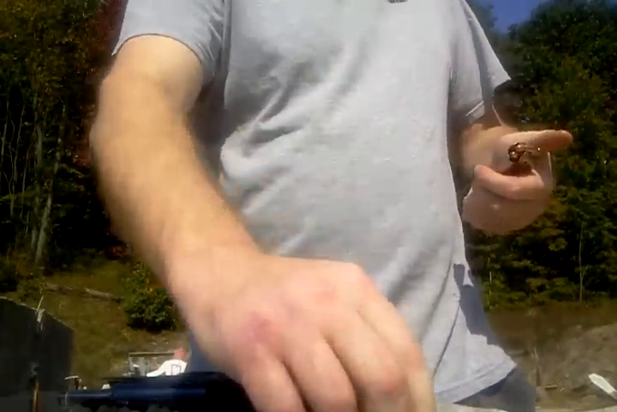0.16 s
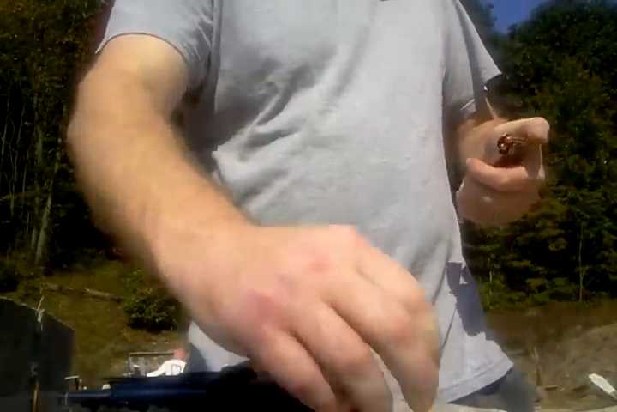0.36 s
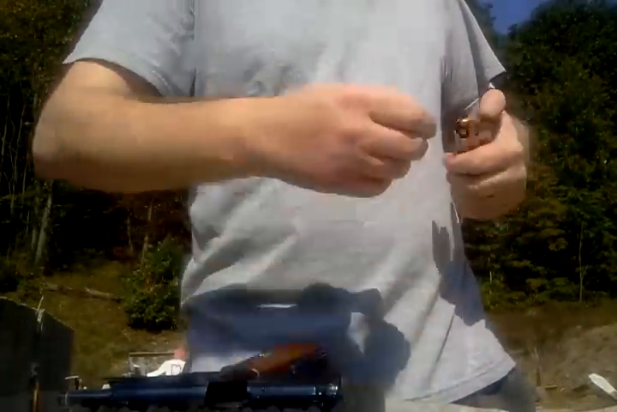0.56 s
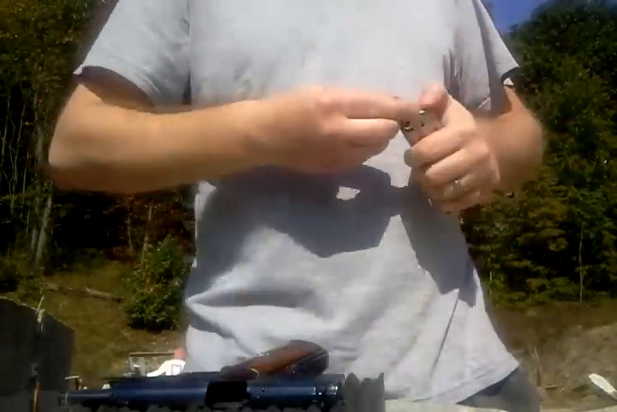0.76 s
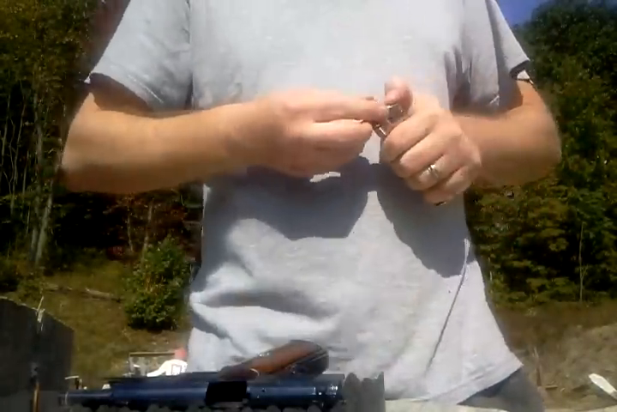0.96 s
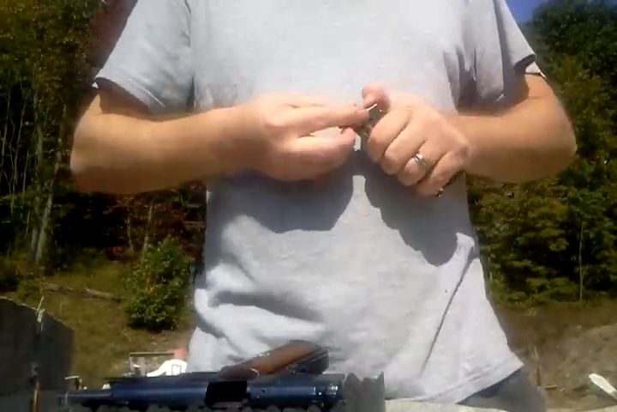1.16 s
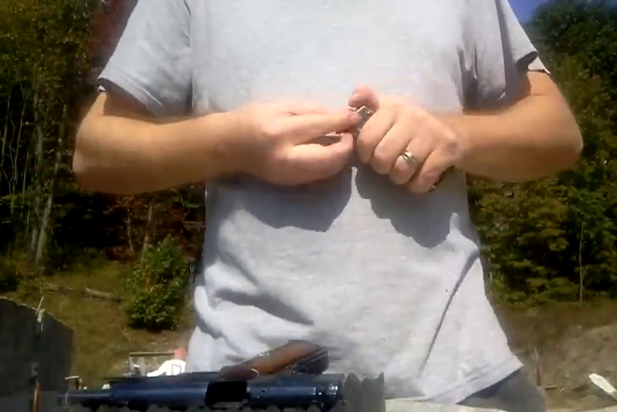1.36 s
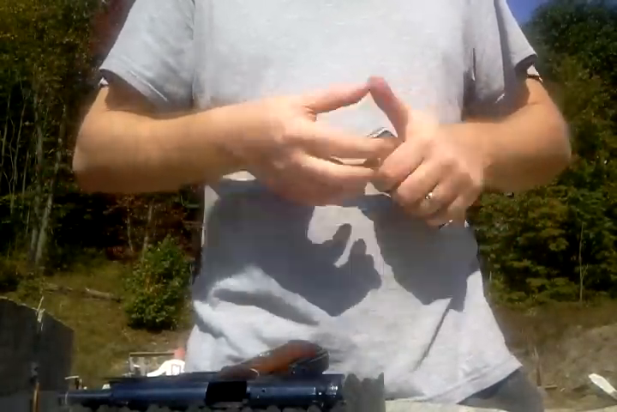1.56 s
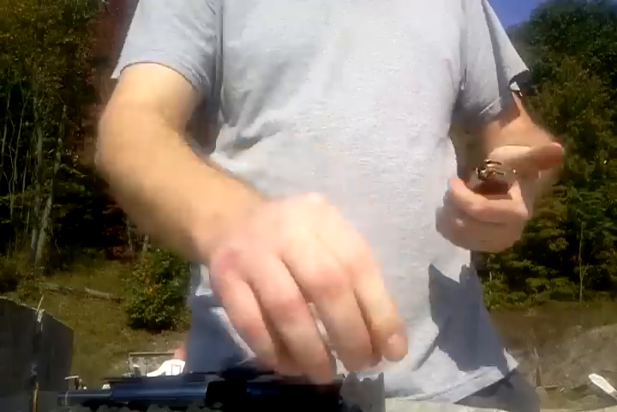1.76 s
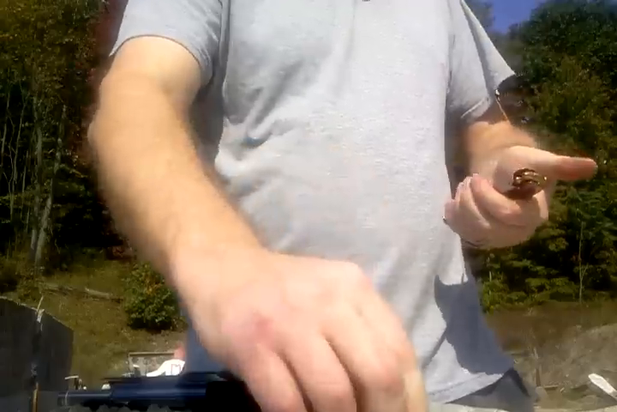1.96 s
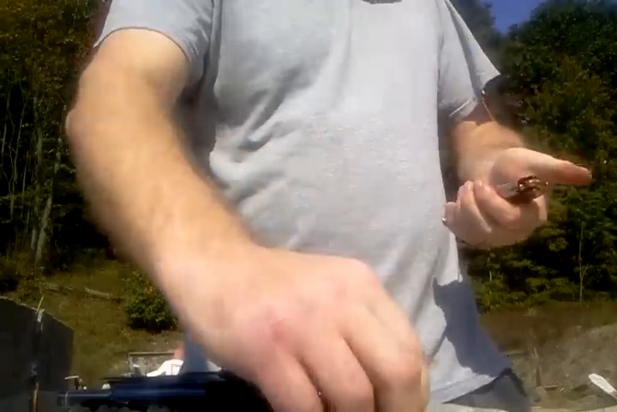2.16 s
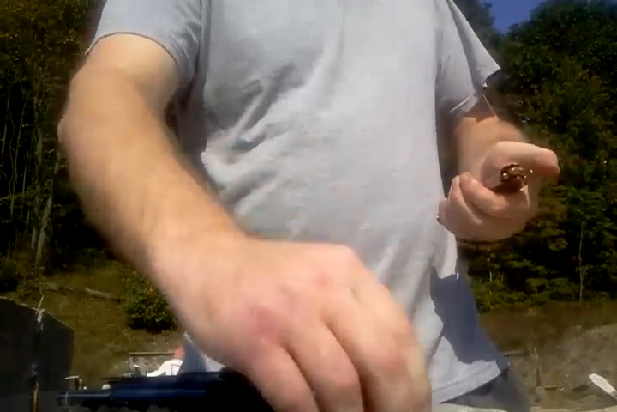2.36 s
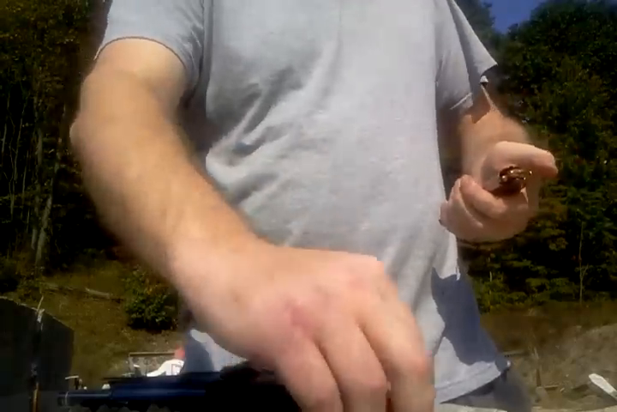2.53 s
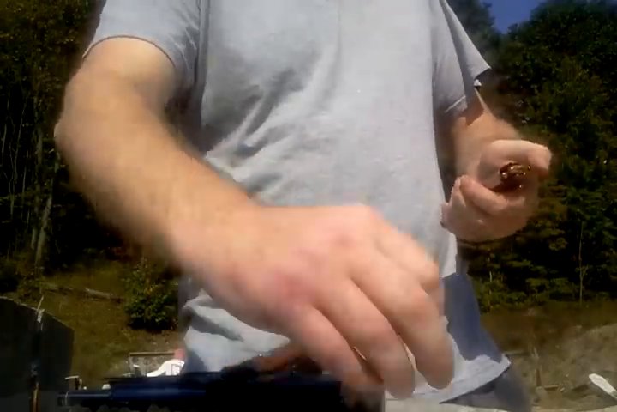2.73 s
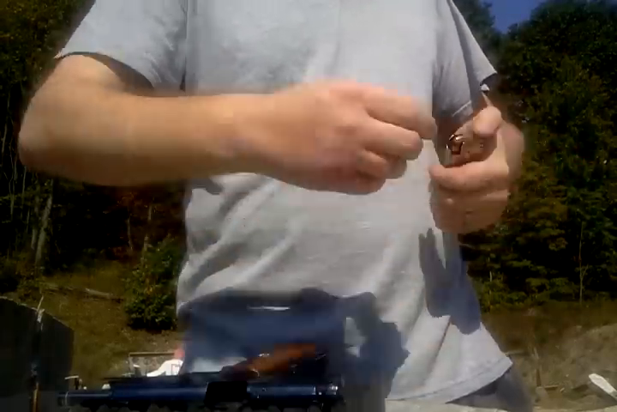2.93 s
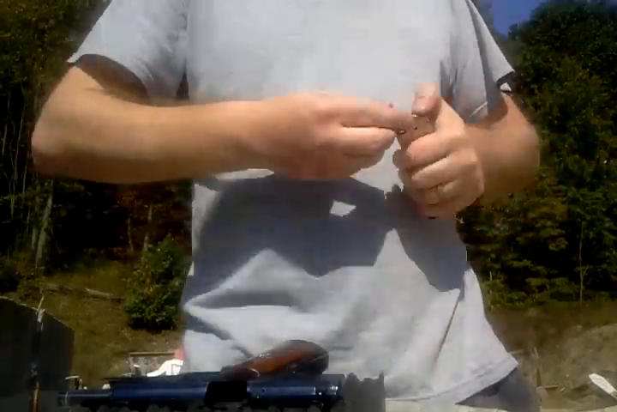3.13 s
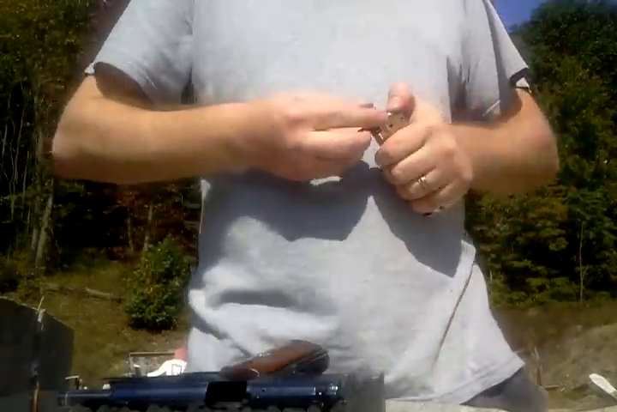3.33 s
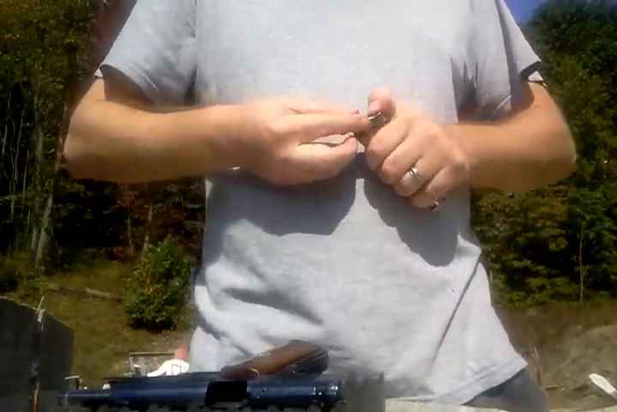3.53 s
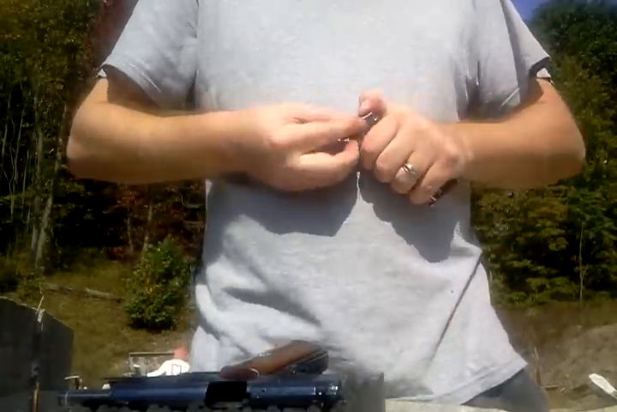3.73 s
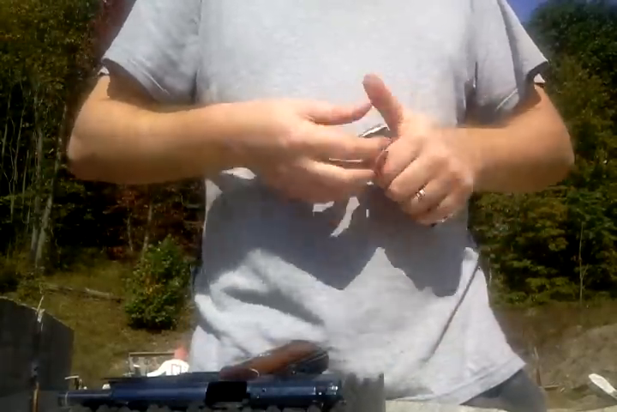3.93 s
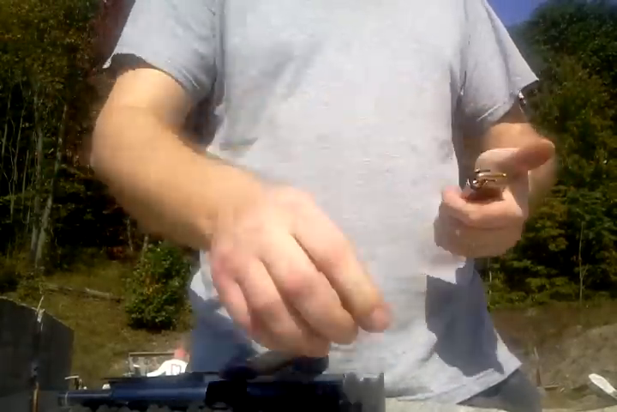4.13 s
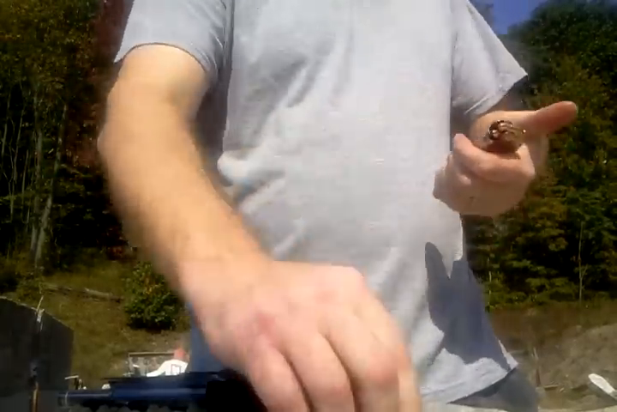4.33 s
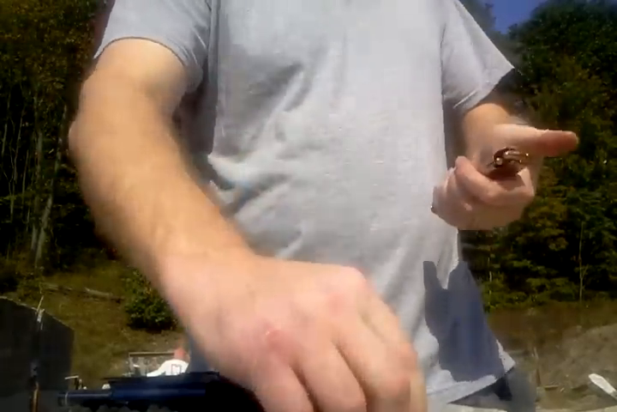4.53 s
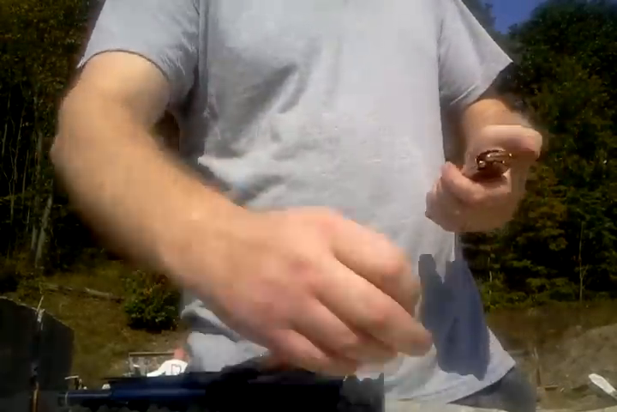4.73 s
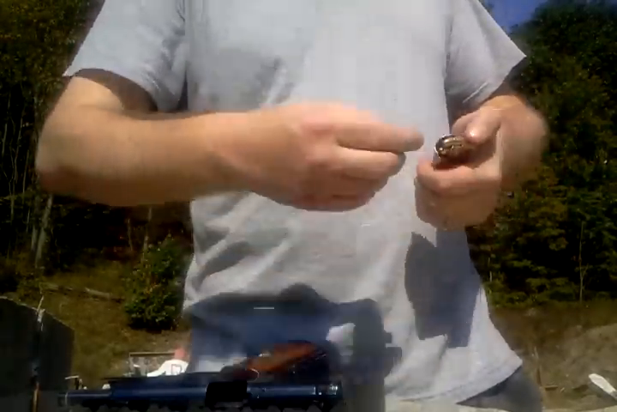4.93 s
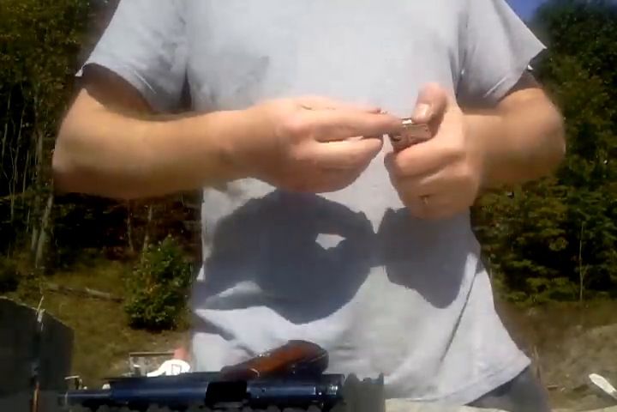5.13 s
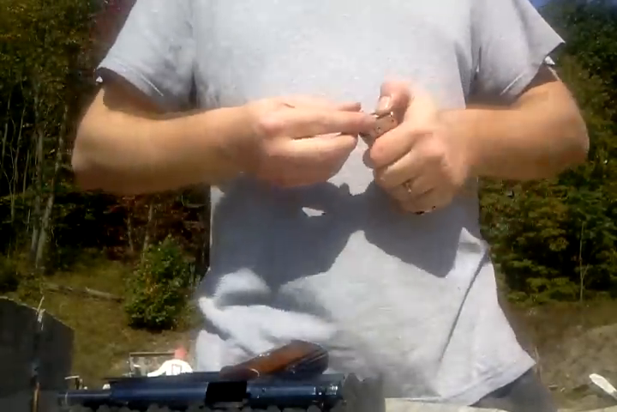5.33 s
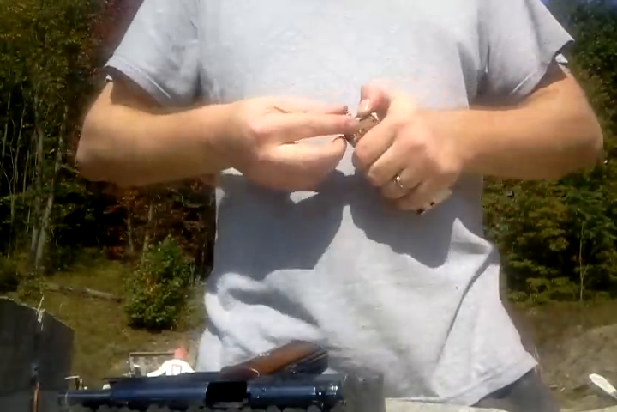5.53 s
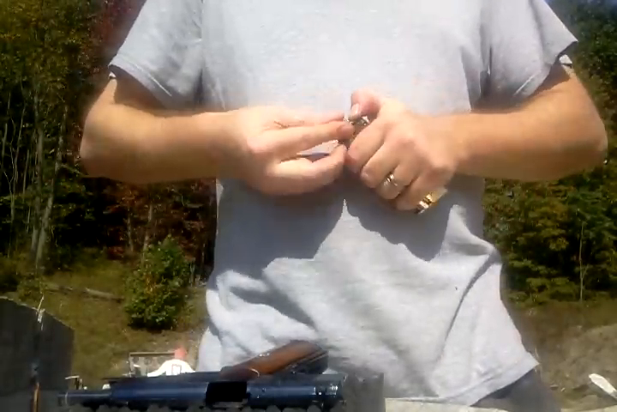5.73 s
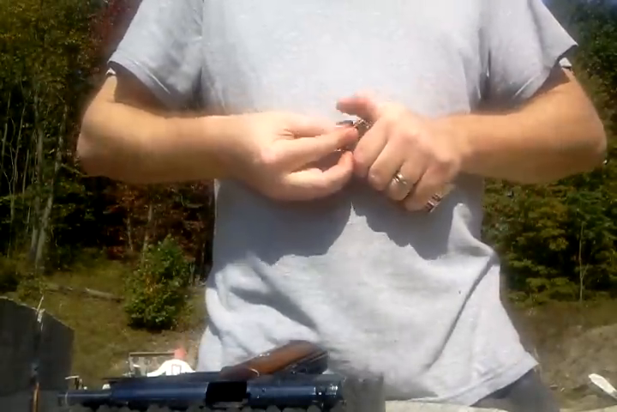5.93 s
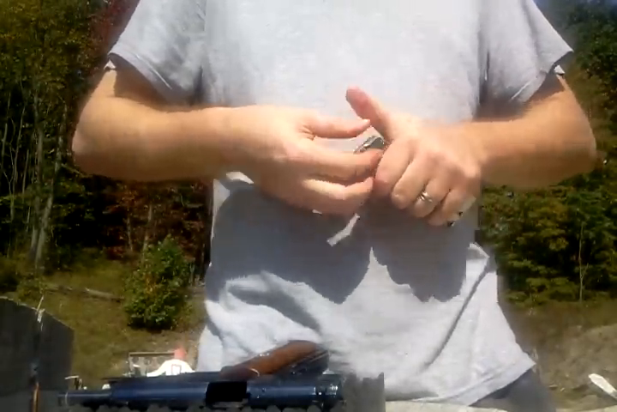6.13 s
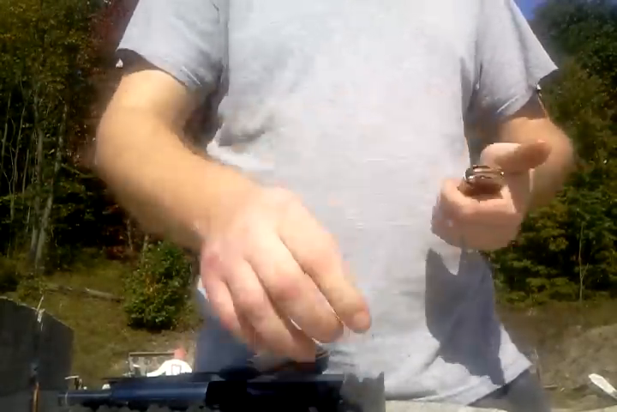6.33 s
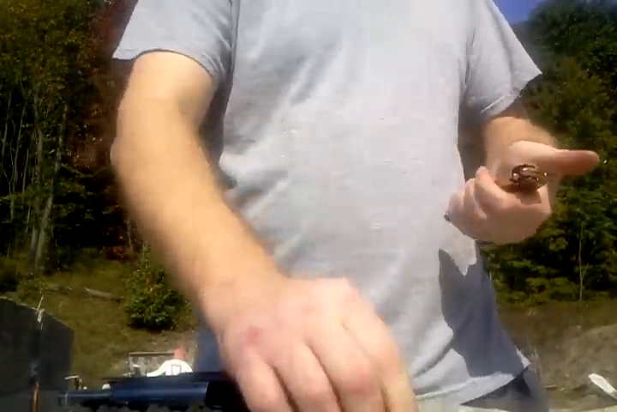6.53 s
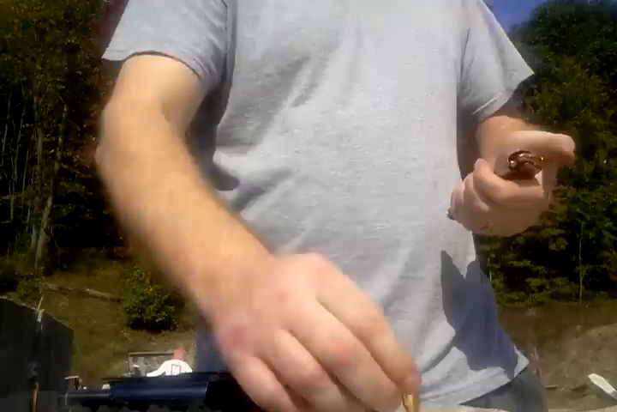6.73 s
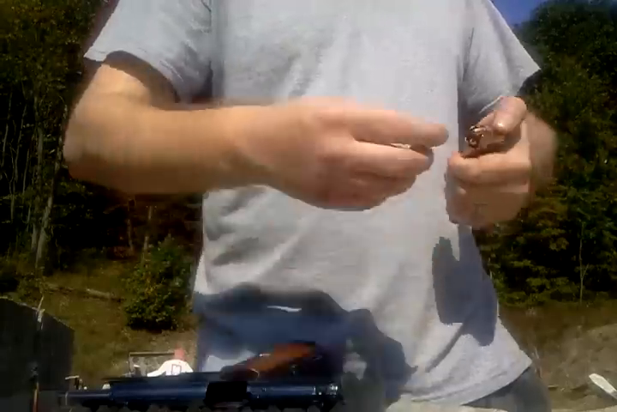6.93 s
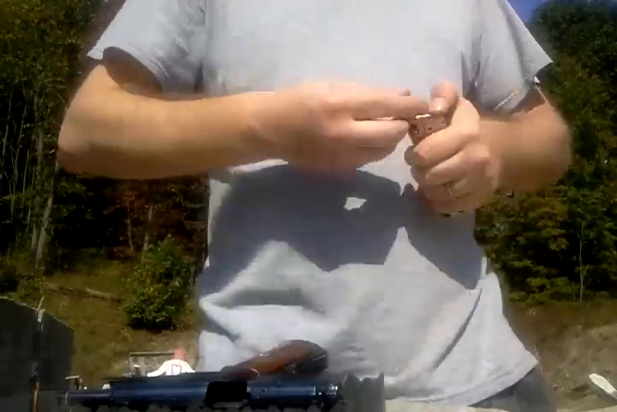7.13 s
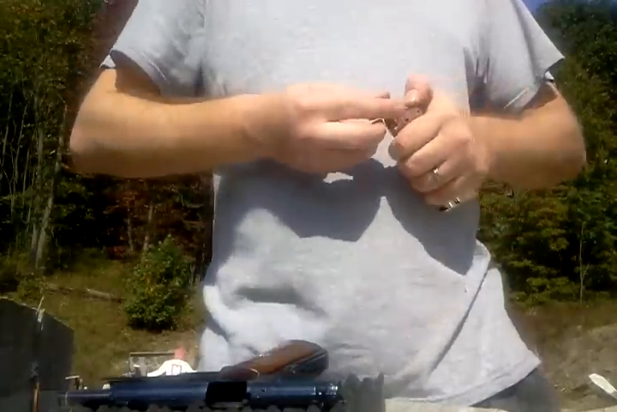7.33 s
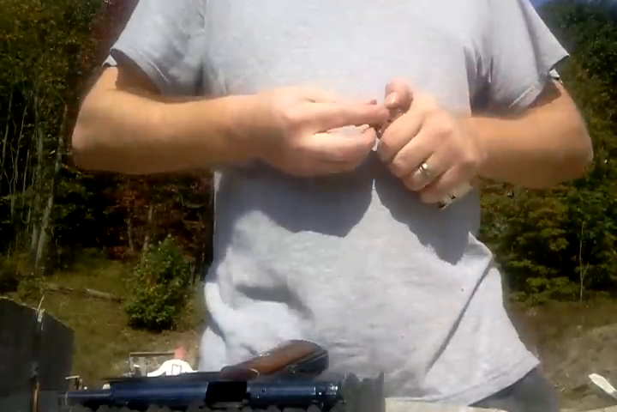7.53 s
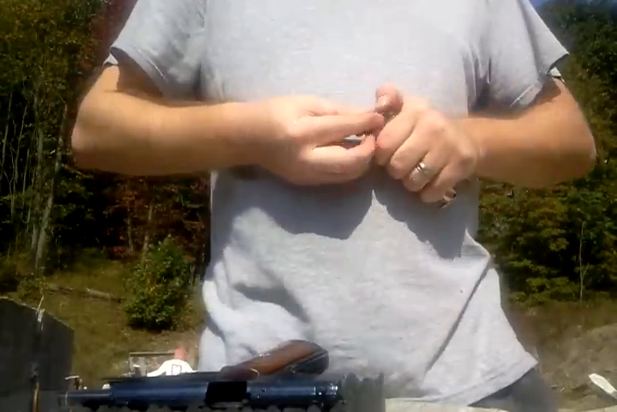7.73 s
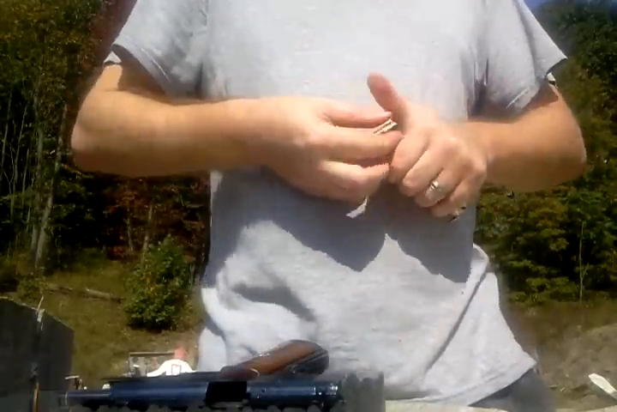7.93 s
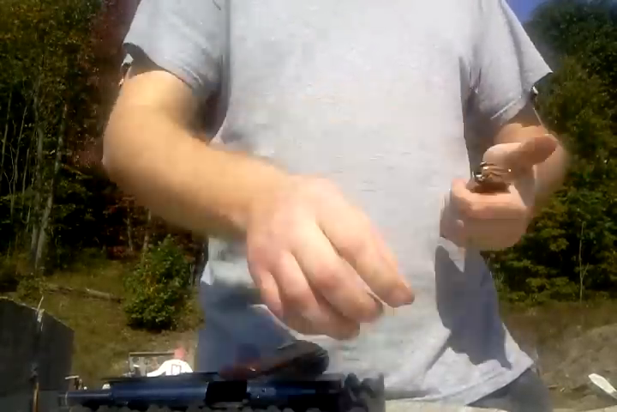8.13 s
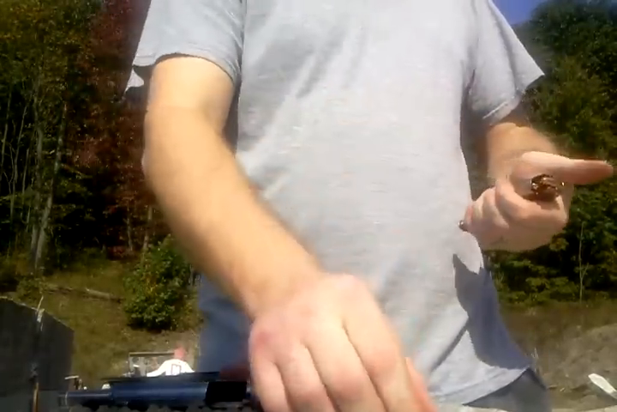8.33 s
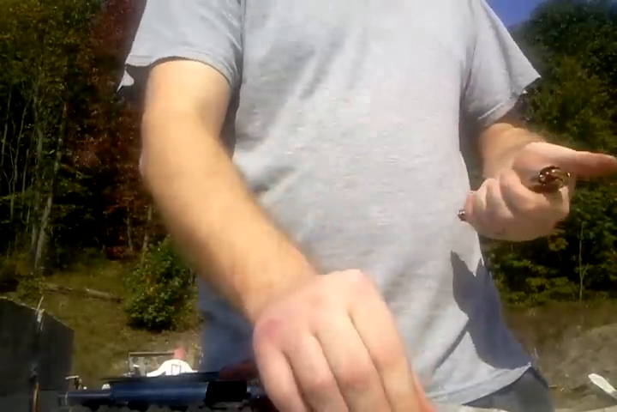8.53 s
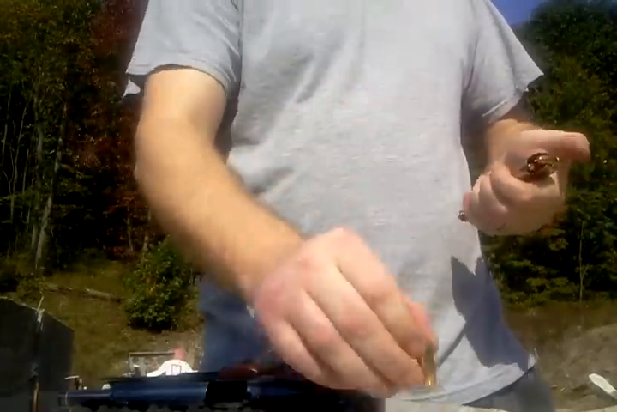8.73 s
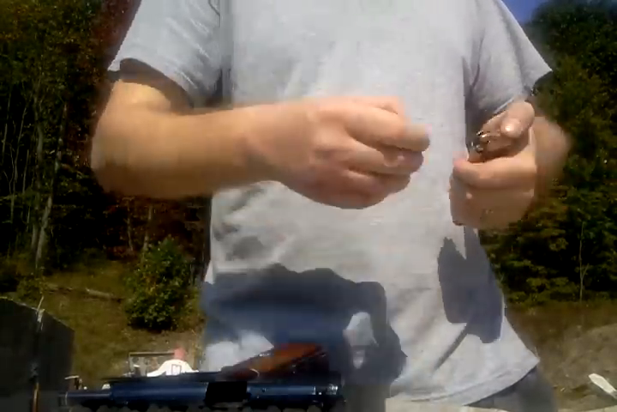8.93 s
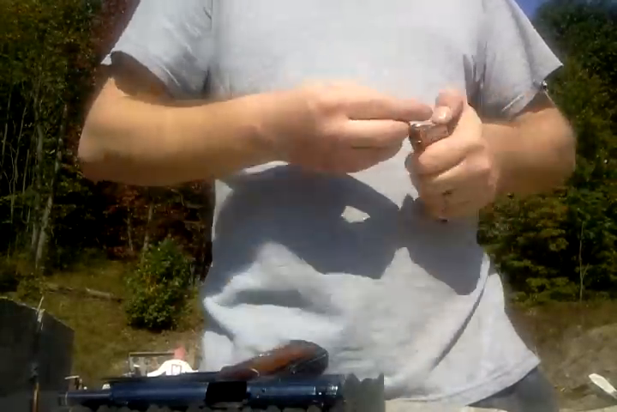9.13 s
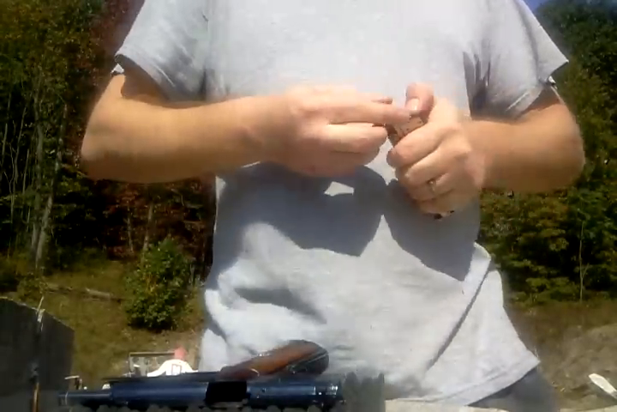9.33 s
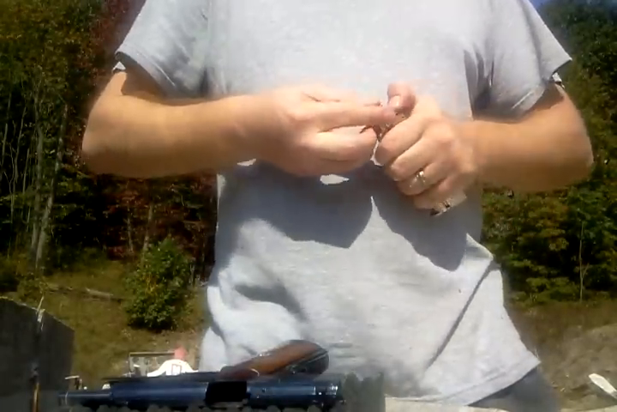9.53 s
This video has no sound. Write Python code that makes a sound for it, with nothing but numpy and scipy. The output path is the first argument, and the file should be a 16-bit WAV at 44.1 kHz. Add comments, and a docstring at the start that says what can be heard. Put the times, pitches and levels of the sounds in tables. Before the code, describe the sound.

Outdoors, soft steady air and a faint distant engine hum run throughout, with a few gentle wind puffs on the small, slightly dull microphone in the first half. Close by, fingers rustle quietly in a cartridge box. From about 1 second, brass clicks and scrapes against a pistol magazine, and a cartridge snaps home at 1.6. More rustling and light knocks come from the box between 2 and 3 seconds. Clicks resume at 3.3, ending in a sharper snap at 4. Brief rummaging follows around 4.5, then more small clicks. At about 5.9 a loud nearby gunshot cracks, its echo swelling back from a wooded slope and fading over a second or so. Clicks and box handling continue, and a second, equally loud shot comes at 7.9 with the same echo. Light rustling and knocks near 8.5 to 9 and faint ticks around 9.5 finish.

```python
"""Cartridges are pressed one by one into a pistol magazine at an outdoor range.
Brass taps, scrapes and snaps under the steel lips, ringing the hand-damped magazine; fingers
bump and rustle in the cartridge box. Two nearby gunshots ring the bench, and the wooded slope
throws each back as a long swelling echo. Behind it: steady air, a faint far engine and soft
puffs of wind on the microphone."""
import sys
import numpy as np
from scipy import signal
from scipy.fft import rfft, irfft, next_fast_len
from scipy.io import wavfile

SR = 44100
rng = np.random.default_rng(int(sys.argv[2]) if len(sys.argv) > 2 else 0)


def materialize(psi):
    """Save the field psi as 16-bit PCM at rate SR to the path in sys.argv[1].

    A 1-D psi becomes a single channel; in a 2-D psi each row is a channel.
    """
    bounded = np.clip(np.atleast_2d(psi).T, -1, 1)
    quanta = np.round(bounded * 32767).astype(np.int16)
    wavfile.write(sys.argv[1], SR, quanta)


N = 426888
TIME_S = np.arange(N) / SR

# Spectra of open air, engine roar and microphone. Each row: frequency in Hz, gain in dB.
AIR_SPECTRUM = [(15, -60), (25, -41.5), (97, -11), (120, -6.5), (230, -8.5), (339, -10), (411, -12.5),
                (562, -9), (699, -16.5), (1130, -21), (1440, -21), (1790, -21.5), (3610, -23.5),
                (5440, -22.5), (8000, -32), (10400, -72.5), (17600, -120)]
ROAR_SPECTRUM = [(60, -19), (120, -3), (175, -5.5), (230, -6), (330, -3), (440, -10.5), (560, -6),
                 (700, -8), (1100, -10.5), (2000, -18.5), (5000, -25)]
MIC_RESPONSE = [(20, -3), (6500, 0.5), (7300, -3.5), (7700, -10.5), (8000, -16.5), (8500, -16),
                (9000, -26.5)]
# Wind on the microphone. Each row: centre in seconds, level in dB, half-width in seconds.
WIND_PUFFS = [(0.245, -62, .03), (0.334, -55, .035), (1.328, -70, .03), (2.143, -55.5, .04),
              (2.437, -54, 0.044), (4.48, -58, .04)]
# Far engine. Each row: time in seconds, firing rate in Hz, hum level in dB.
ENGINE_TRACK = [(0, 135.7, -68.5), (1.4, 128.8, -60.5), (3, 123.3, -62.5), (5, 128.3, -60.5),
                (9.68, 127.6, -58.5)]
# Engine resonances. Each row: frequency in Hz, width in Hz, level in dB relative to the roar.
DRONE_BANDS = [(169, 8, -10.5), (275.4, 9.9, -13), (330, 6, -11.5), (560, 45, -9)]

# Gunshots. Each row: start in seconds, gain in dB.
GUNSHOTS = [(5.9487, 0), (7.912, 0.2)]
# Echoes off rough surfaces nearby. Each row: delay in seconds, relative level in dB, spread in seconds.
NEAR_ECHOES = [(.0026, -19, 0.0013), (0.018, -14, 0.001), (0.0236, -5.5, 0.00165), (.06, -17, .0007),
               (0.0835, -4, 0.0011)]
# Scatter off ground and benches, trees, far slope. Each row: frequency in Hz, gain in dB.
GROUND_SPECTRUM = [(50, -34), (130, -6), (250, -4.5), (380, 3), (900, 4.5), (1500, -4.5), (2300, -9.5),
                   (3400, -8), (5500, -9.5), (8000, -26.5)]
WOODS_SPECTRUM = [(60, -52), (150, -28.5), (260, -20), (370, -8), (600, -1), (1000, -0.5), (1600, -1),
                  (2100, -5.5), (3000, -4), (4800, -7), (6300, -3), (8000, -13)]
SLOPE_SPECTRUM = [(100, -39), (400, -15.5), (750, 0.5), (1150, -1), (1800, -7.5), (4000, -14.5),
                  (8000, -25.5)]

# Modes of bench, box and hand-damped magazine. Each row: frequency in Hz, gain in dB, T60 in seconds.
BENCH_MODES = [(378, -35, 0.06), (623.6, -25, 0.14), (697, -24.5, 0.082)]
BOX_MODES = [(256, -22, 0.08), (420, -22, .0075), (734, -12, 0.0089), (970, -4, .011), (1330, -2.5, 0.008),
             (1800, -1, 0.0082), (2340, -2.5, 0.0055), (2850, 2, 0.0063), (3640, 2.5, 0.01),
             (4800, 0, 0.0032), (6070, 1.5, 0.0057), (6530, -5.5, 0.0038)]
MAGAZINE_MODES = [(480, -24.5, .0098), (1080, -10, 0.0052), (1443, -6, 0.019), (1765, -0.5, 0.0078),
                  (2490, -4, 0.0088), (3187, -3, 0.017), (4060, -7, .0097), (4800, -8.5, .0075),
                  (5200, -9.5, 0.0054), (5840, -2, 0.0093), (6700, -12, 0.0072), (7160, -7, 0.0044)]
# Fingers and brass bumping the box. Each row: start in seconds, relative level in dB,
# hardness 0-1, scrape length in seconds, thud in Hz.
BOX_KNOCKS = [(.1408, -54, 0.38, 0.0063, 358), (.5676, -52, 0, .0019, 228),
              (2.2255, -51.5, 0.42, 0.0047, 536), (2.3995, -54.5, 0.73, .012, 458),
              (2.4144, -45.5, 0.28, 0.0099, 193), (2.4346, -48, 0.1, 0.012, 248),
              (2.6863, -57.5, .75, 0.0039, 450), (2.9075, -57, 0.6, .0035, 290),
              (2.9193, -44, 0.99, .0023, 267), (2.9288, -43.5, 0.4, 0.0064, 264.4),
              (4.4699, -48, 0.84, 0.0061, 563), (4.5467, -61.5, 0.87, .0029, 290),
              (6.9306, -40, 0.37, .0051, 473), (8.5118, -44, 0.63, 0.0037, 516),
              (8.9069, -43.5, 0.2, 0.0018, 484)]
# Fingers sliding cartridges in the box. Each row: start in seconds, length in seconds, level in dB.
RUMMAGE_RUNS = [(.02, .04, -63), (.18, 0.15, -57.5), (.342, 0.069, -56.5), (.45, 0.097, -57),
                (2.1, 0.061, -52.5), (2.178, 0.16, -54.5), (2.713, 0.17, -58), (4.48, .135, -53.5),
                (4.755, 0.12, -55.5), (6.7, .02, -52), (6.818, 0.054, -46.5), (6.888, .04, -49),
                (8.53, 0.039, -50.5), (8.645, .1, -52.5), (8.86, .04, -52)]
# Case rubbing the lips. Each row: start in seconds, length in seconds, level in dB, spot ring in Hz.
CASE_SLIDES = [(1.37, 0.047, -51, 3020), (1.46, 0.046, -46.5, 3100), (1.635, 0.082, -53, 3170),
               (3.375, 0.058, -61.5, 5100), (3.8, 0.07, -53, 6000), (4.018, 0.078, -61, 5760),
               (5.5, 0.03, -60, 4060), (7.74, 0.061, -59, 6140), (7.82, 0.094, -55.5, 2210)]
# Thumb working a cartridge in. Each row: start in seconds, length in seconds, relative level in dB.
THUMB_RUNS = [(1.115, 0.2, -54), (1.573, .03, -51.5), (3.42, 0.087, -45.5), (3.9, .11, -56.5),
              (5.583, .03, -48), (7.767, 0.035, -46), (9.396, 0.034, -48.5), (9.557, .03, -52)]
# Brass on the magazine. Each row: start in seconds, relative level in dB, firmness 0-1,
# scrape length in seconds, spot ring in Hz.
BRASS_CLICKS = [(.9865, -45, 0.78, 0.005, 2900), (1.0123, -43.5, 0.6, .0033, 5680),
                (1.075, -48, 0.4, .0032, 6400), (1.2867, -53, 1, .0036, 3150),
                (1.3922, -43.5, 1, 0.0023, 2930), (1.4357, -39, .2, 0.003, 5200),
                (1.4972, -33.5, 0.74, 0.0048, 5760), (1.6111, -38, 0.66, .0027, 4370),
                (1.6656, -42.5, 1, 0.0022, 2850), (1.6911, -43, 0.93, 0.0068, 5800),
                (3.2642, -30, 0.44, .011, 4200), (3.3689, -38, 0.53, 0.0066, 4320),
                (3.7317, -37, .85, 0.0032, 5840), (3.7542, -44, 0.93, 0.0033, 5230),
                (3.7919, -22, 0.62, 0.0027, 5100), (3.8186, -43, 0.94, .0026, 5800),
                (3.984, -34, 0.78, 0.011, 5760), (4.0826, -40.5, 0.6, 0.0021, 5940),
                (4.101, -47, 0.92, 0.0053, 5870), (5.2532, -36.5, 0.5, .0034, 6400),
                (5.4915, -28.5, 0.26, 0.004, 4140), (5.5494, -43.5, 0.54, .0014, 5800),
                (5.7997, -42.5, 0.64, 0.0021, 6100), (5.8887, -40, 1, 0.0011, 2630),
                (5.8984, -37, .95, 0.0019, 3300), (5.9264, -43, 0.5, .0014, 6240),
                (5.942, -39.5, .6, 0.0017, 3200), (6.2225, -27.5, .5, 0.0024, 2440),
                (6.3177, -28, 0.44, 0.0043, 5990), (7.2627, -36, .2, 0.0011, 5300),
                (7.586, -33.5, 0, 0.0022, 6800), (7.7366, -46.5, 0.98, 0.0045, 5340)]
# Cartridges snapping home. Each row: time in seconds, relative level in dB.
SEATINGS = [(1.63, -23.5), (4.015, -16.5)]
# One snap: a light catch, then a loud stop with a thin bright tick on top.
# Each row: lead in seconds, gain in dB, firmness 0-1, scrape length in seconds, spot ring in Hz.
SNAP_CONTACTS = [(.0113, -9.5, 0.88, 0.0041, 4200), (0.00061, -5, .25, 0.00098, 4540),
                 (0.00087, 0, 0.63, 0.0027, 6770)]


def gain_of(db):
    """Decibels to amplitude."""
    return 10 ** (np.asarray(db) / 20)


def unit_rms(x):
    """Scales to rms 1."""
    return x / np.sqrt(np.mean(x ** 2) + 1e-20)


def coloured(x, spectrum):
    """Filters x by a spectrum table, interpolated over log frequency."""
    size = next_fast_len(len(x) + 2048)
    bins_hz = np.fft.rfftfreq(size, 1 / SR)
    hz, db = np.transpose(spectrum)
    gains = gain_of(np.interp(np.log(bins_hz + 1), np.log(hz + 1), db))
    return irfft(rfft(x, size) * gains, size)[:len(x)]


def add(mix, start_s, sound):
    """Mixes a sound in at start_s."""
    part = mix[max(round(start_s * SR), 0):][:len(sound)]
    part += sound[:len(part)]


def drift(rate_hz):
    """Random wander of rms 1."""
    knots = rng.standard_normal(4096)
    return unit_rms(np.interp(TIME_S * rate_hz, np.arange(len(knots)), knots))


def noise(spectrum):
    """Coloured noise of rms 1."""
    return unit_rms(coloured(rng.standard_normal(N), spectrum))


def open_air(level_db=-56.5):
    """Steady, mostly low noise."""
    return gain_of(level_db) * noise(AIR_SPECTRUM)


def wind(spectrum=((15, -20), (50, -9), (90, 0), (200, -2), (600, -45), (3000, -94))):
    """Soft low puffs on the microphone."""
    envelope = sum(gain_of(db) * np.exp(-((TIME_S - centre_s) / width_s) ** 2)
                   for centre_s, db, width_s in WIND_PUFFS)
    return envelope * noise(spectrum)


def far_engine(wander=.0075, flutter_db=1.4, roar_db=-66.5, growth_db_per_s=1.48):
    """Hum at the firing rate; roar and droning resonances slowly grow."""
    times_s, *columns = np.transpose(ENGINE_TRACK)
    firing_hz, hum_db = (np.interp(TIME_S, times_s, column) for column in columns)
    cycles = np.cumsum(firing_hz * (1 + wander * drift(9))) / SR
    hum = np.sqrt(2) * np.sin(2 * np.pi * cycles) * gain_of(hum_db + flutter_db * drift(15))
    drone = np.zeros(N)
    for hz, width_hz, db in DRONE_BANDS:
        phasor = drift(width_hz) + 1j * drift(width_hz)
        drone += gain_of(db) * (phasor * np.exp(2j * np.pi * hz * TIME_S)).real
    roar = .86 * noise(ROAR_SPECTRUM) + drone
    return hum + roar * gain_of(roar_db + growth_db_per_s * TIME_S + .47 * drift(8))


def slope_swell(t, level_db=-29, fade_db_per_s=27.5, rise_s=.26):
    """Echo envelope: the far slope answers late and dies slowly."""
    return gain_of(level_db - fade_db_per_s * t) * np.minimum(t / rise_s, 1) ** 2


def woods_swell(t, level_db=-22, crest_s=.21, steepness=3.3):
    """Echo envelope: the blast reaches ever more trees while weakening with distance."""
    reach = t / crest_s
    return gain_of(level_db) * (reach * np.exp(1 - reach)) ** steepness


def ground_swell(t, level_db=-24.5, fade_db_per_s=50.5, rise_s=.0038,
                 burst_db=-20.5, delay_s=.019, spread_s=.0081):
    """Echo envelope: ground scatter fades steadily; benches add a short burst."""
    ground = gain_of(level_db - fade_db_per_s * t) * (1 - np.exp(-t / rise_s))
    benches = gain_of(burst_db) * np.exp(-((t - delay_s) / spread_s) ** 2)
    return np.hypot(ground, benches)


def blast(t, push_s=.00067, band_hz=(140, 4200), gain_db=-5.5, bench_db=11, size=1024):
    """A sharp push and longer suction, ringing the bench and smeared by rough surfaces nearby."""
    pulse = (1 - t / push_s) * np.exp(-t / push_s)
    pulse = signal.sosfilt(signal.butter(2, band_hz, "bandpass", fs=SR, output="sos"), pulse)
    out = pulse + sum(gain_of(bench_db + db - 60 * t / t60_s) * np.cos(2 * np.pi * hz * t)
                      for hz, db, t60_s in BENCH_MODES)
    crack = signal.sosfilt(signal.butter(1, 900, "highpass", fs=SR, output="sos"), pulse[:size])
    for delay_s, db, spread_s in NEAR_ECHOES:
        echo = signal.fftconvolve(crack, rng.standard_normal(size) * np.exp(-t[:size] / spread_s))
        add(out, delay_s, gain_of(db - .5) * echo * np.linalg.norm(pulse) / np.linalg.norm(echo))
    return gain_of(gain_db) * out


def gunshots(coherence_hz=3600, air_loss_db_per_s_khz=6.5, lumps_db=2):
    """Both shots meet the same ground and trunks; the treble, off moving leaves, scatters anew."""
    t = np.arange(SR * 3 // 2) / SR
    out, direct = np.zeros(N), blast(t)
    still_paths = rng.standard_normal((3, len(t))) * gain_of(lumps_db * drift(300)[:len(t)])
    hz, delay_s, still = signal.stft(still_paths, SR, nperseg=256)
    coherence = np.exp(-hz / coherence_hz)[:, None]
    air_loss = gain_of(-air_loss_db_per_s_khz * np.outer(hz / 1000, delay_s))
    for start_s, db in GUNSHOTS:
        moving = signal.stft(rng.standard_normal(still_paths.shape), SR, nperseg=256)[2]
        ground, woods, slope = coherence * still + np.sqrt(1 - coherence ** 2) * moving
        shot = direct.copy()
        for paths, spectrum, swell in ((ground, GROUND_SPECTRUM, ground_swell(t)),
                                       (woods * air_loss, WOODS_SPECTRUM, woods_swell(t)),
                                       (slope, SLOPE_SPECTRUM, slope_swell(t))):
            scatter = coloured(signal.istft(paths, SR, nperseg=256)[1][:len(t)], spectrum)
            shot += scatter / np.std(scatter[:SR // 3]) * swell
        add(out, start_s, gain_of(db) * shot)
    return out


def ring(modes, detune=0, vary_db=0, size=4096):
    """A body's response to one tap; grip and spot struck shift each mode's pitch and level."""
    out, t = np.zeros(size), np.arange(size) / SR
    for hz, db, t60_s in modes:
        grip, spot, phase = rng.standard_normal(3)
        envelope = gain_of(db + vary_db * spot - 60 * t / t60_s)
        out += envelope * np.sin(2 * np.pi * (hz * (1 + detune * grip) * t + phase))
    return out


def contacts(rows, modes, edges_hz, soft_db, hard_db, gain_db, detune, vary_db, chatter,
             spot_db, spot_t60_cycles, size=4096):
    """A tap and brief slips ring body and spot; hardness sets the low, middle and high band levels."""
    out, t = np.zeros(N), np.arange(size) / SR
    bands = [signal.butter(3, band_hz, "bandpass", fs=SR, output="sos")
             for band_hz in zip(edges_hz, edges_hz[1:])]
    for start_s, db, hardness, scrape_s, spot_hz in rows:
        force = chatter * rng.standard_normal(size) ** 3 * np.exp(-(t / scrape_s) ** 2)
        force[0] += 1
        response = ring(modes, detune, vary_db) + ring([(spot_hz, spot_db, spot_t60_cycles / spot_hz)])
        body = signal.fftconvolve(force, response)[:size]
        levels_db = gain_db + db + np.add(soft_db, hardness * np.subtract(hard_db, soft_db))
        for band, level_db in zip(bands, levels_db):
            part = signal.sosfilt(band, body)
            add(out, start_s, gain_of(level_db) * part / np.linalg.norm(part))
    return out


def friction(strokes, modes, grain_db, slips_per_s, hiss, detune, spot_db, spot_t60_s=.01, gain_db=0):
    """Tiny uneven slips ring the body and the rubbed spot."""
    out = np.zeros(N)
    light_touch = signal.butter(2, 1400, "highpass", fs=SR, output="sos")
    for start_s, length_s, db, spot_hz in strokes:
        size = round(length_s * SR)
        slips = (rng.random(size) < slips_per_s / SR) * rng.choice([-1, 1], size)
        slips = slips * gain_of(grain_db * np.minimum(rng.exponential(1, size), 3))
        force = (unit_rms(slips) + hiss * rng.standard_normal(size)) * signal.windows.tukey(size, .4)
        response = ring(modes, detune, vary_db=1) + ring([(spot_hz, spot_db, spot_t60_s)])
        sound = signal.sosfilt(light_touch, signal.fftconvolve(force, response))
        add(out, start_s, gain_of(db + gain_db) * sound / np.std(sound[:size]))
    return out


def finger_moves(runs, every_s, jitter, vary_db, spot_hz, vary_pitch):
    """Splits runs into uneven moves; yields start in seconds, level in dB, spot ring in Hz."""
    for start_s, length_s, db in runs:
        count = max(round(length_s / every_s), 1)
        for k, (late, strength, spot) in enumerate(rng.standard_normal((count, 3))):
            move_s = start_s + (k + jitter * late * (k > 0)) * length_s / count
            yield move_s, db + vary_db * strength, spot_hz * np.exp(vary_pitch * spot)


def box_rustle(stroke_s=.04):
    """Short overlapping finger strokes over the cases in the box."""
    moves = finger_moves(RUMMAGE_RUNS, every_s=.034, jitter=.08, vary_db=2, spot_hz=3620, vary_pitch=.07)
    strokes = [(start_s, stroke_s, db, hz) for start_s, db, hz in moves]
    return friction(strokes, BOX_MODES, grain_db=4.5, slips_per_s=1300, hiss=.59, detune=.057,
                    spot_db=-4.5, gain_db=.5)


def box_knocks():
    """Soft fingertips thud on the box; hard brass clacks."""
    return contacts(BOX_KNOCKS, BOX_MODES, edges_hz=(140, 700, 2300, 8000),
                    soft_db=(1.5, -11.5, -23), hard_db=(-.5, 12.5, 10.5), gain_db=26,
                    detune=.02, vary_db=.5, chatter=.036, spot_db=-11.5, spot_t60_cycles=15)


def case_slides():
    """A brass case rubs along the steel lips."""
    return friction(CASE_SLIDES, MAGAZINE_MODES, grain_db=9, slips_per_s=1100, hiss=.51, detune=.048,
                    spot_db=-4)


def magazine_clicks(tick_firmness=.77, tick_scrape_s=.0042):
    """Clicks, snaps and thumb ticks: a glancing touch is thin, a firm press rings the whole magazine."""
    snaps = [(seat_s - lead_s, db + part_db, *touch)
             for seat_s, db in SEATINGS for lead_s, part_db, *touch in SNAP_CONTACTS]
    moves = finger_moves(THUMB_RUNS, every_s=.06, jitter=.33, vary_db=4.5, spot_hz=5620, vary_pitch=.23)
    ticks = [(start_s, db, tick_firmness, tick_scrape_s, hz) for start_s, db, hz in moves]
    return contacts(BRASS_CLICKS + snaps + ticks, MAGAZINE_MODES, edges_hz=(350, 2300, 4300, 8500),
                    soft_db=(-30.5, -17, 0), hard_db=(-6, 1.5, -.5), gain_db=24,
                    detune=.025, vary_db=4.5, chatter=.1, spot_db=4.5, spot_t60_cycles=29)


def loading(reflection_db=-24, delay_s=.004, t60_s=.09):
    """Magazine and box, with a weak short reflection off the bench and the body."""
    direct = magazine_clicks() + box_knocks() + box_rustle() + case_slides()
    t = np.arange(SR // 5) / SR
    tail = rng.standard_normal(len(t)) * gain_of(-60 * t / t60_s) * (t > delay_s)
    return direct + gain_of(reflection_db) * signal.oaconvolve(direct, tail / np.linalg.norm(tail))[:N]


def scene():
    """Hands close by; shots, engine, air and wind around them. Mono."""
    return (loading() + gunshots() + far_engine() + open_air() + wind())[None]


def record(dry):
    """Small microphone with a dull top and a steep band limit."""
    sound = coloured(dry[0], MIC_RESPONSE)
    band_limit = signal.firwin(511, cutoff=9065, window=("kaiser", 9), fs=SR)
    return signal.oaconvolve(sound, band_limit, "same")[None]


dry = scene()
out = record(dry)
materialize(out)
```